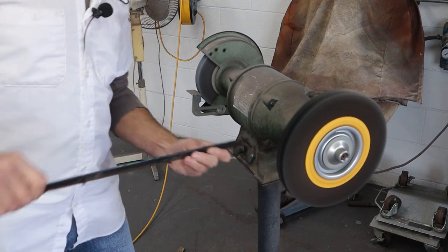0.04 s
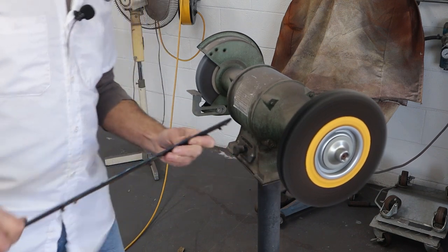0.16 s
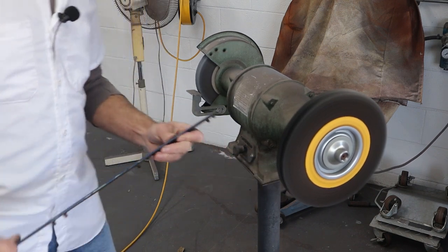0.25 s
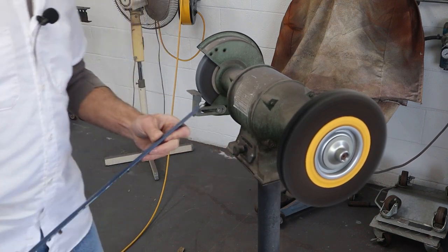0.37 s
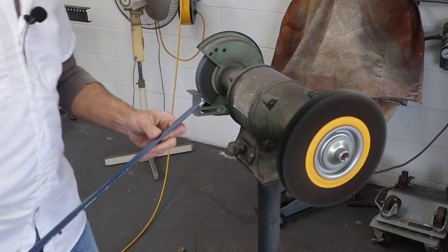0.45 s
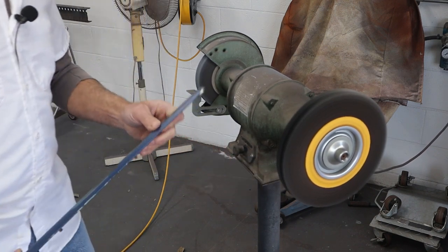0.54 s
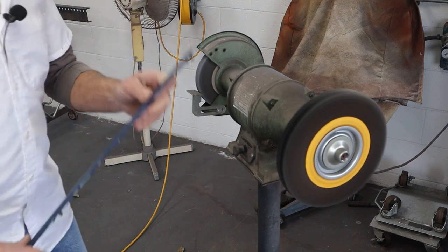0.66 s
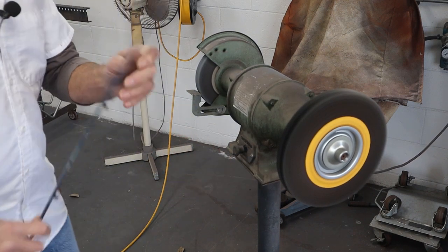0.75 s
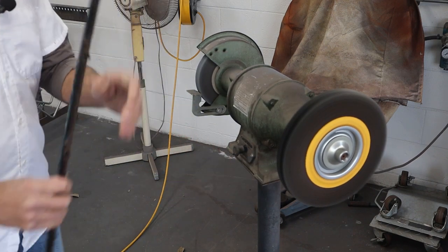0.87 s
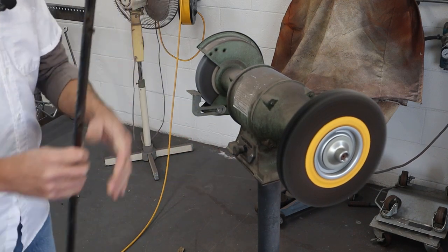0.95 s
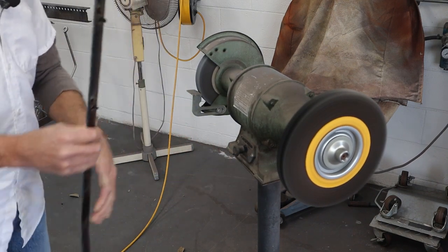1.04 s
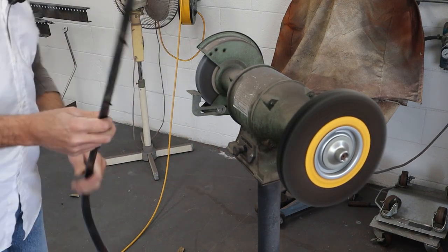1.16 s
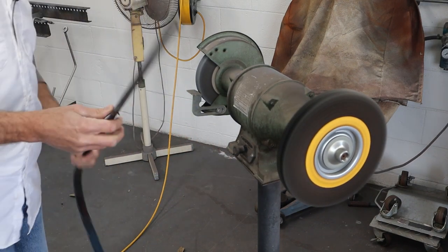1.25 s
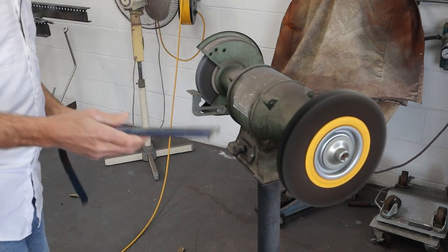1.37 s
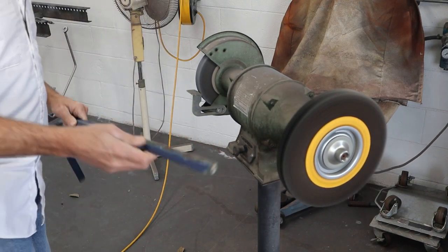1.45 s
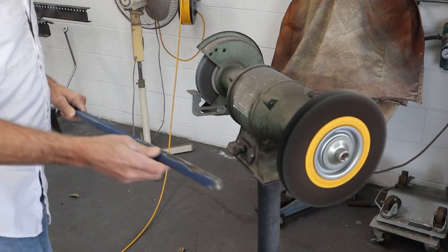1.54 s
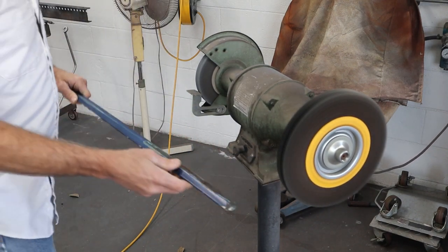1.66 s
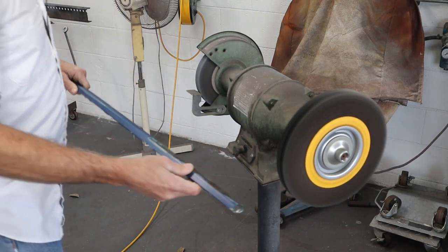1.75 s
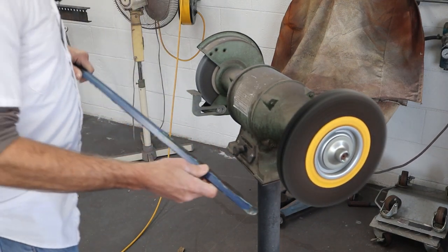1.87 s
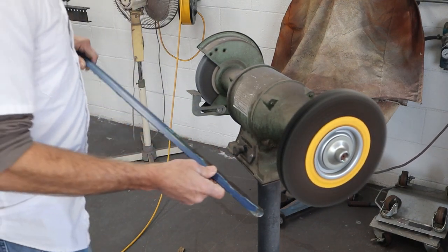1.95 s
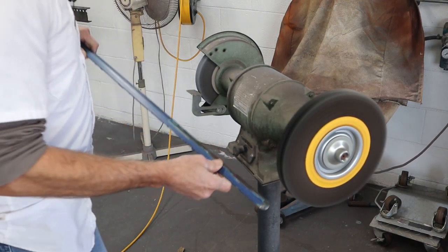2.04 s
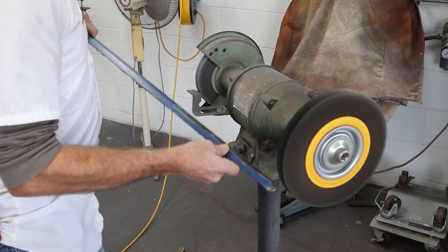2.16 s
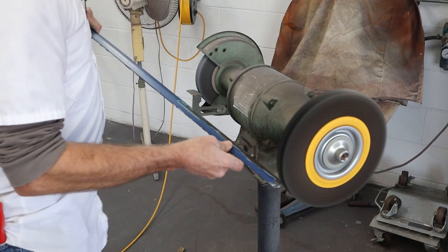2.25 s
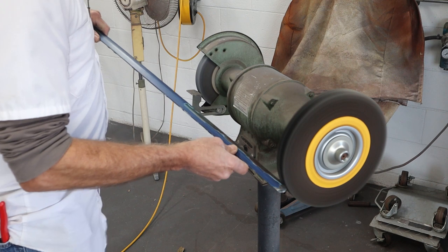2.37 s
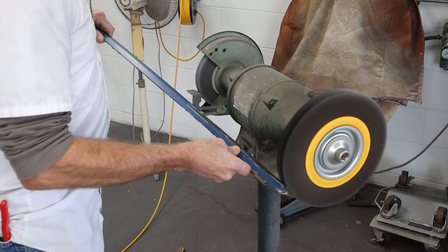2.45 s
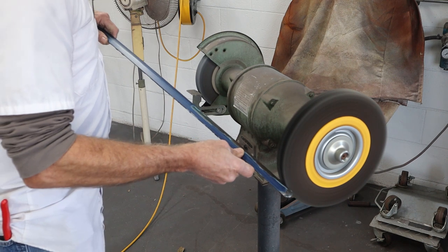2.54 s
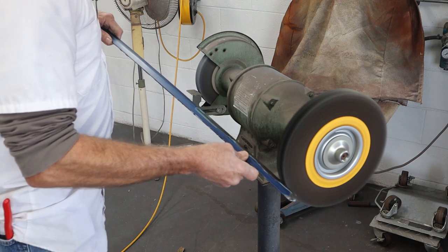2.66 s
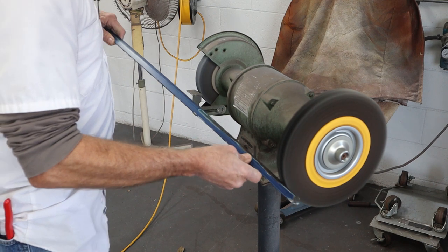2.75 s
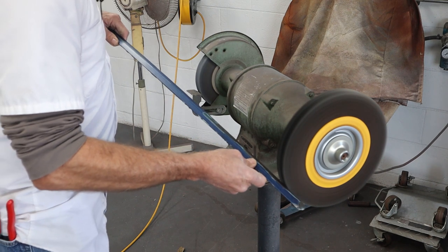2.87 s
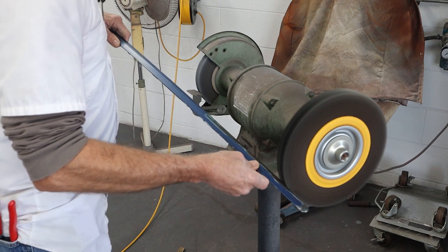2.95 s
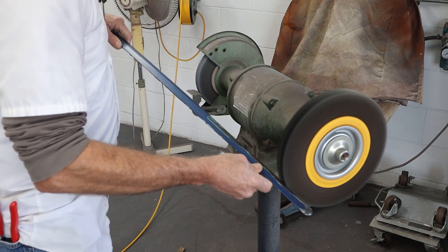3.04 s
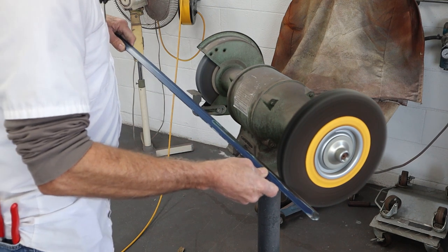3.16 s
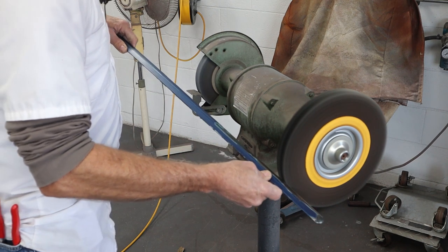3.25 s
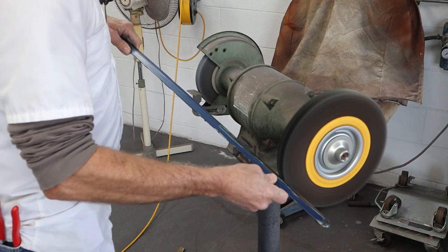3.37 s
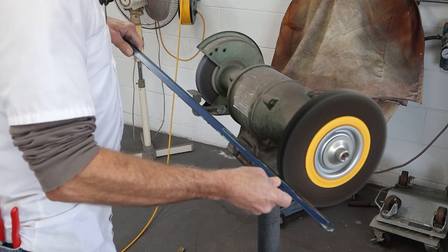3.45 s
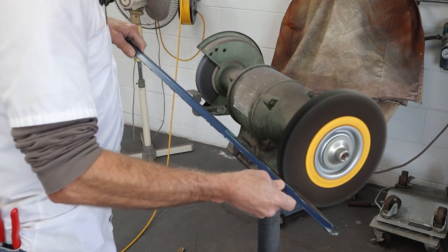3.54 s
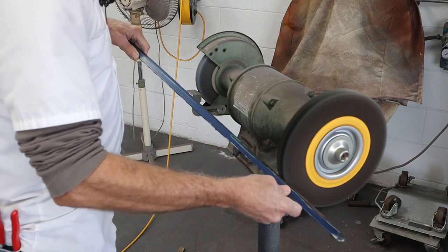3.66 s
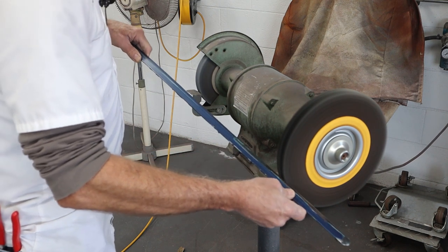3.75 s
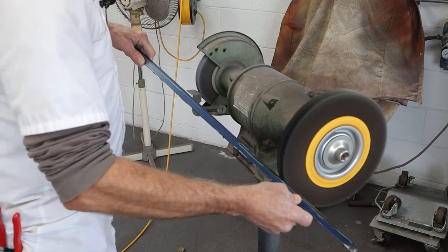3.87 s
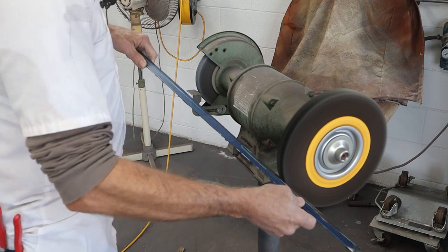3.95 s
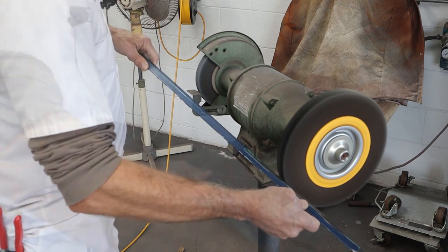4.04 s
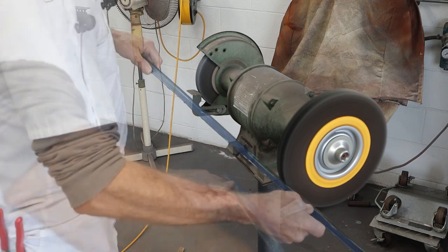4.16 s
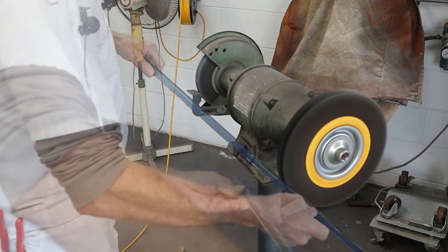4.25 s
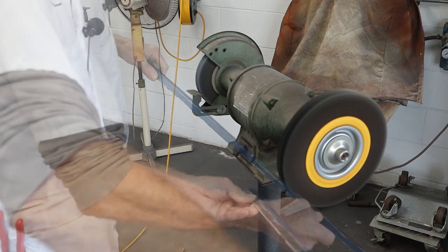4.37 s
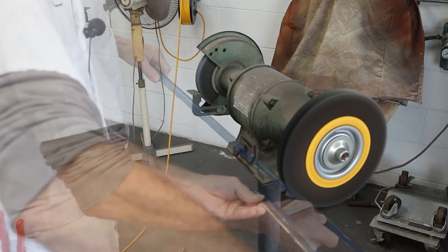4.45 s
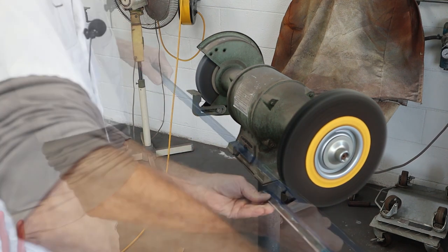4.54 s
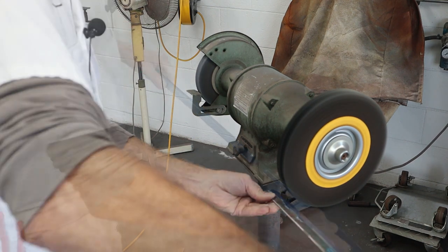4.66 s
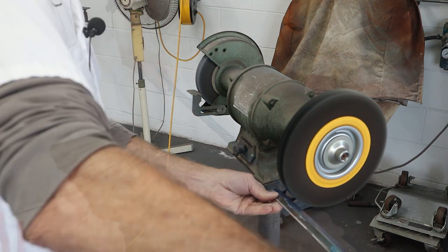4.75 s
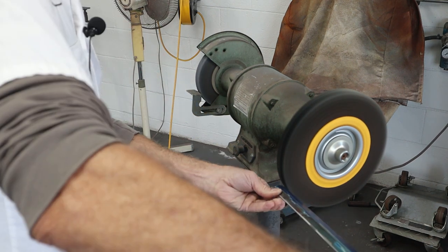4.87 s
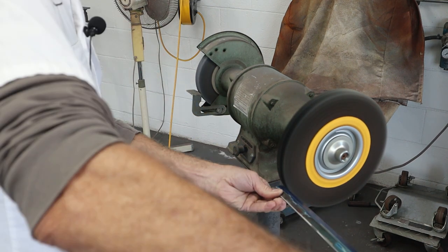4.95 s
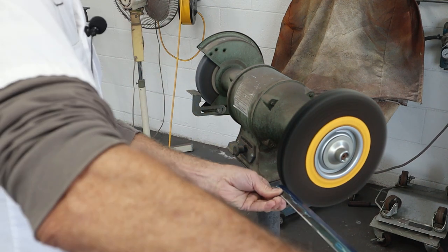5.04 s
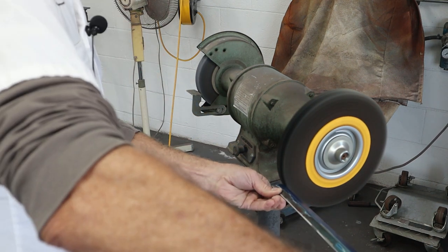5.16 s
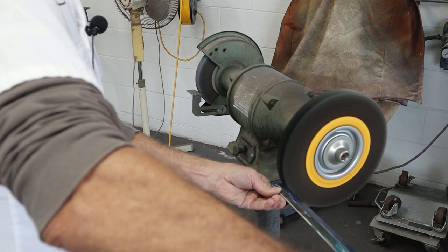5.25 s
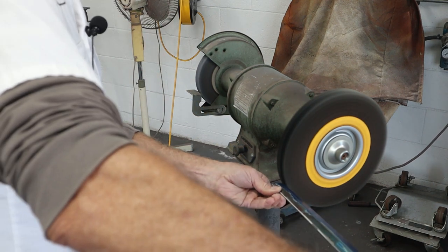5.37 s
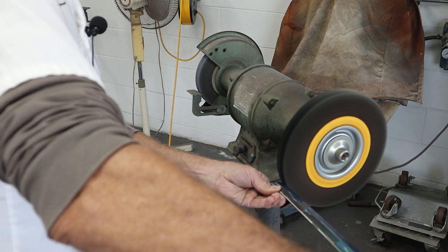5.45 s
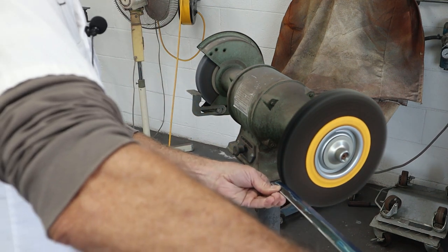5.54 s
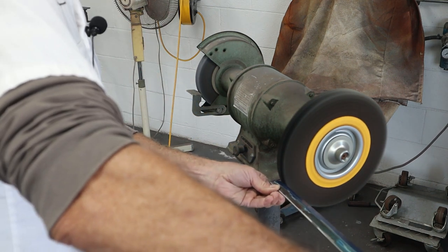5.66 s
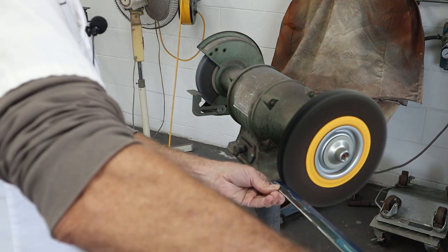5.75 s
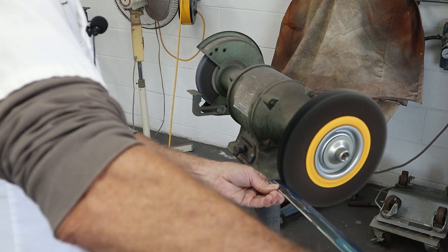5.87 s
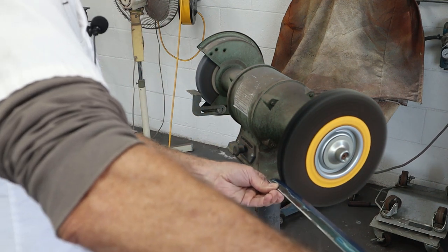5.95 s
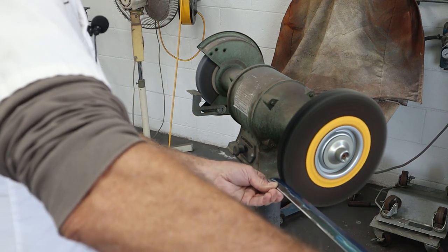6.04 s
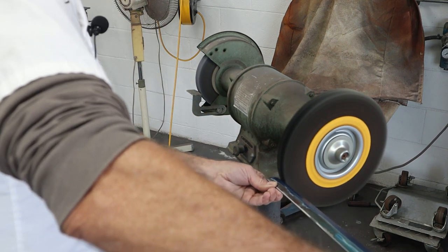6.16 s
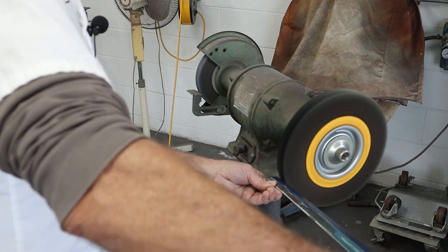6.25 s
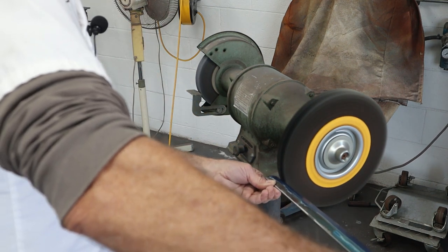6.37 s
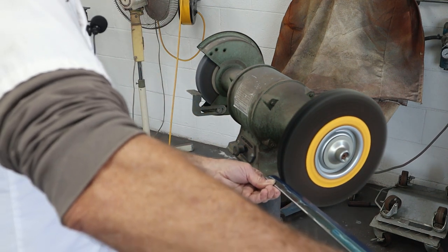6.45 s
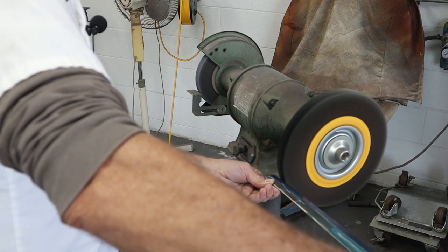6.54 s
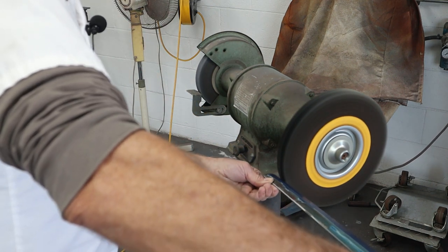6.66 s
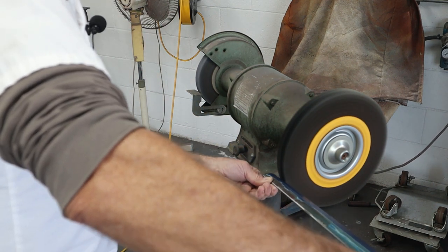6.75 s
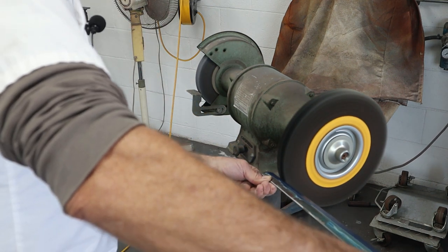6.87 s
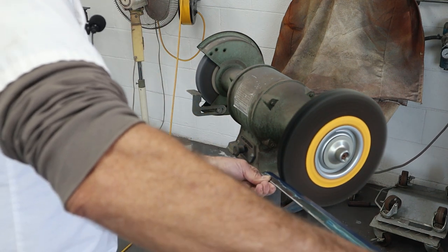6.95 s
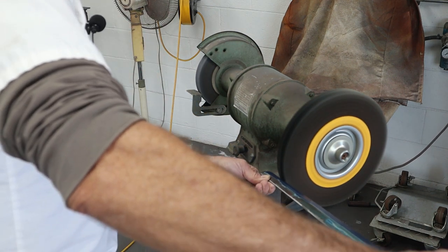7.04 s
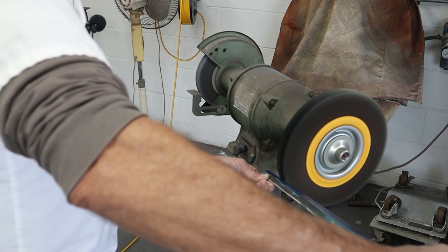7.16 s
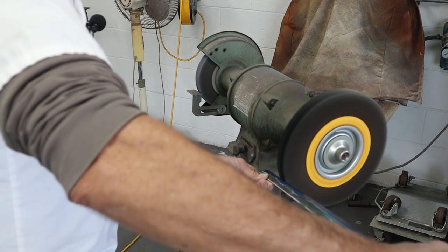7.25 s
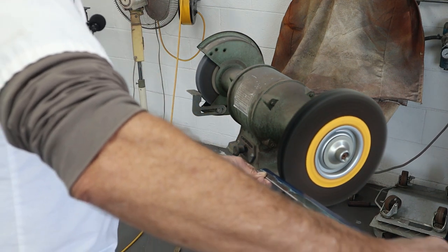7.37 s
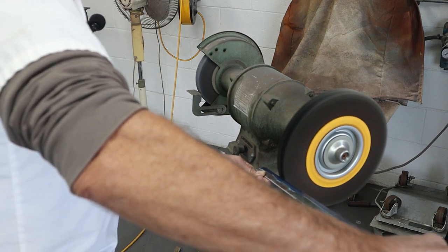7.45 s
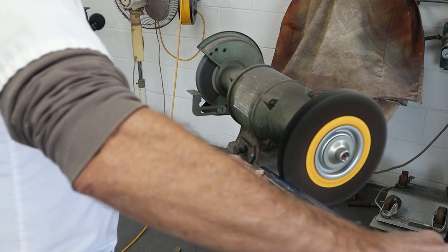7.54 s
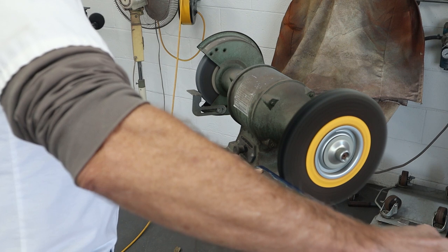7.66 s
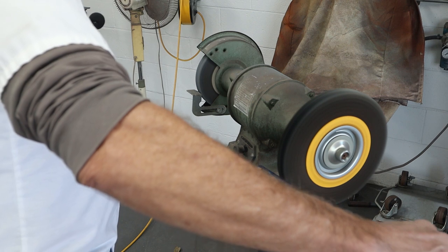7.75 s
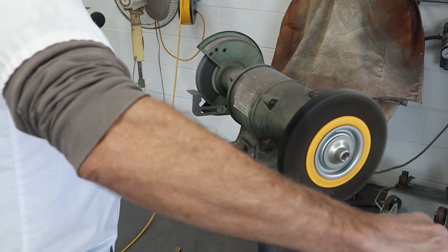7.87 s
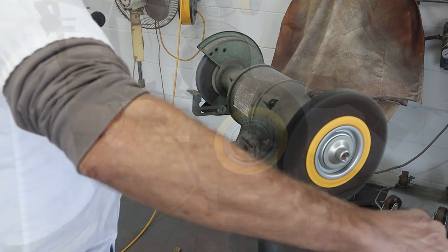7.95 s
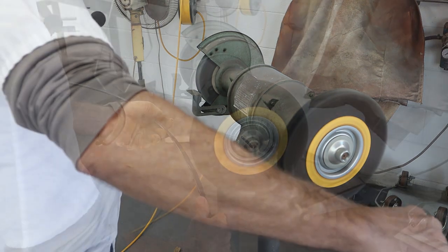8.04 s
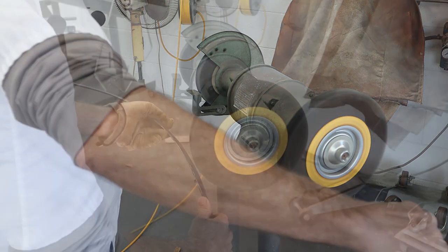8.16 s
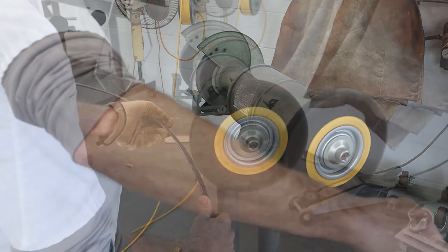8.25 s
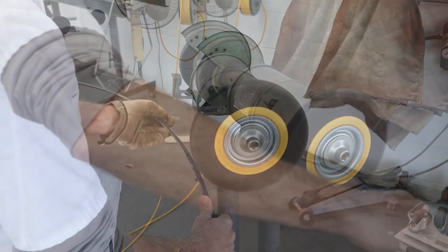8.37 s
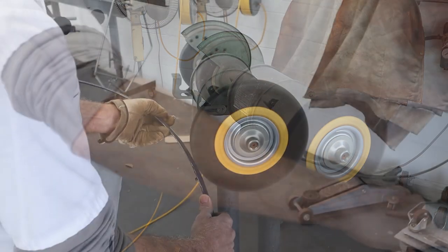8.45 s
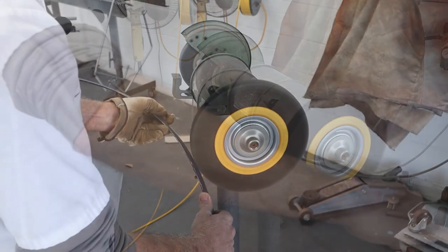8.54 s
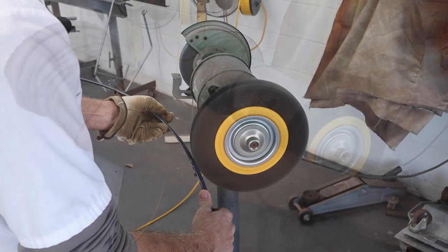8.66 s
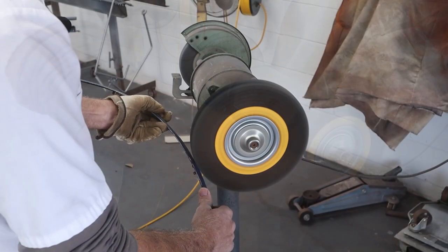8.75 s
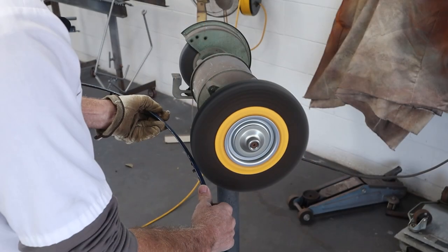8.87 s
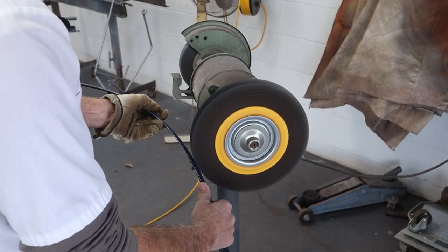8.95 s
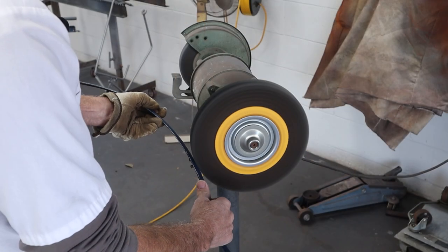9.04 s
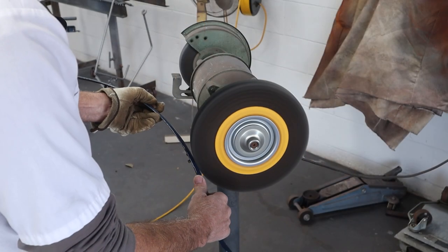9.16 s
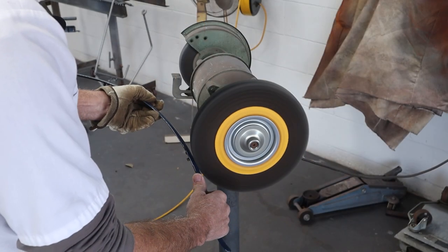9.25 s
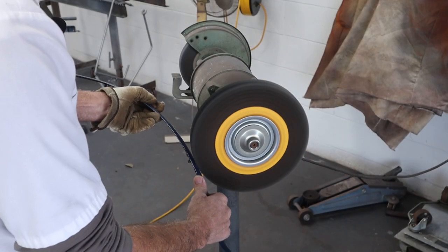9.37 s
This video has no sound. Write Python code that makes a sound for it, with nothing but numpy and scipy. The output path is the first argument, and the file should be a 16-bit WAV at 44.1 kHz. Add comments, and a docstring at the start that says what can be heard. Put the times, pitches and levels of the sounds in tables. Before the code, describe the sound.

A steel strip scrapes harshly against a spinning bench-grinder wire wheel in three passes, while the wheel's draught thumps and buffets a lapel microphone.

```python
"""A steel strip scrapes on the wire wheel of a bench grinder, pressed on it in three passes.
The same bristles strike once a turn, so the scrape is combed at the wheel speed, which sags under load.
The wheel's draught buffets a lapel microphone: bursts of low rumble and higher flutter over a slow sway.
Beneath lie a workshop hum, the hiss of the wires through the air and the tones of the motor.
The sound runs in three stretches; the wheel turns freely again at the start of the second and third."""
import sys
import numpy as np
from scipy import signal
from scipy.fft import rfft, irfft, next_fast_len
from scipy.io import wavfile
from scipy.ndimage import uniform_filter1d, map_coordinates

SR = 44100
rng = np.random.default_rng(int(sys.argv[2]) if len(sys.argv) > 2 else 0)


def invert_db(level):
    """Linear amplitude ratio for a level in decibels (20 dB per decade), elementwise."""
    return 10 ** (np.asarray(level, dtype=float) / 20)


def transcribe(u):
    """Save the signal u as a 16-bit wav file named by the first command-line argument.

    u: samples, shape (n,) or (channels, n), limited to [-1, 1]; the rate is SR.
    q: integer samples, one column per channel.
    """
    v = np.clip(np.atleast_2d(u).T, -1, 1)
    q = np.round(v * 32767).astype(np.int16)
    wavfile.write(sys.argv[1], SR, q)


N = 414540
TIME = np.arange(N) / SR


def unit(x):
    """Scaled to rms 1."""
    return x / np.sqrt(np.mean(x ** 2) + 1e-20)


def along(points, hz):
    """Level in dB along (pitch_hz, level_db) points on a log pitch axis, -120 dB outside them."""
    f, v = np.transpose(points)
    return np.interp(np.log(hz + 1), np.log(f + 1), v, left=-120, right=-120)


def curves(rows, t=TIME):
    """One curve for each column after the time."""
    s, *columns = np.transpose(rows)
    return [np.interp(t, s, column) for column in columns]


def wobble(rate, t=TIME):
    """A smooth random curve with a given rate of knots a second."""
    return map_coordinates(rng.standard_normal(400), [np.clip(t * rate, 0, 398)])


def during(t, start, end, fade):
    """1 between start and end, with soft edges lasting fade seconds."""
    return np.clip(np.minimum(t - start, end - t) / fade + 1 / 2, 0, 1)


def noise(spectrum):
    """Noise of rms 1, coloured by shaping its spectrum."""
    m = next_fast_len(N)
    hz = np.fft.rfftfreq(m, 1 / SR)
    shaped = rfft(rng.standard_normal(m)) * invert_db(along(spectrum, hz))
    return unit(irfft(shaped, m)[:N])


# The three stretches and how the load slows the wheel in each.
# columns: start_s, load_start_s, speed_loss_hz_per_s, growth_of_loss_hz_per_s2
STRETCHES = [(0, 2.42, 2.4, .42), (4.425, 5.4, 4.9, -.65), (8.395, 8.37, 4.6, 0)]


def stretch():
    """Which stretch each sample belongs to."""
    return np.searchsorted([row[0] for row in STRETCHES], TIME, side="right") - 1


def speed():
    """Turns per second: free until the strip loads the wheel, then sagging."""
    free_hz = 56.7
    _, load_start, loss, growth = np.transpose(STRETCHES)[:, stretch()]
    loaded = np.maximum(TIME - load_start, 0)
    return free_hz - loss * loaded - growth * loaded ** 2


# Level of the workshop at the microphone. columns: time_s, hum_db
WORKSHOP = [(0, -37.5), (.8, -40.5), (1.6, -41.5), (2.7, -38), (4.42, -42.5), (4.43, -39), (5.15, -45.5),
            (5.3, -44), (8.39, -71), (8.4, -37.5), (9.4, -37.5)]
# Colour of the hum. columns: pitch_hz, level_db (per Hz, relative)
HUM_COLOUR = [(20, -32), (60, -45), (150, -42), (400, -1), (650, -5), (1130, -3), (2430, -6), (3300, -9),
              (6000, -11.5), (16200, -16.5)]
# Colour of the hiss of the wires. columns: pitch_hz, level_db (per Hz, relative)
HISS_COLOUR = [(2000, -58), (3200, -18.5), (4470, -15.5), (5550, -5), (6420, -4.5), (7400, -10.5),
               (8500, -10), (14000, -17.5), (16200, -22)]
# Hiss over the hum, one value for each stretch. column: level_db
HISS_LEVELS = [5.5, -0.5, 6]
# Tones of the motor. columns: pitch_hz, level_db (relative to the whine level)
MOTOR = [(118.4, -10), (409.1, 2), (479.1, -8.5), (522.2, -18), (1098, -11), (1174, -14)]


def idle():
    """Wires hiss through the air over the workshop's hum and the slightly unsteady tones of the motor."""
    tones = np.zeros(N)
    for hz, db in MOTOR:
        loudness = invert_db(db + 0.5 * wobble(3.2))
        tones += loudness * np.sin(2 * np.pi * hz * TIME + 0.5 * wobble(8))
    # the whine, in dB over the hum, comes forward for a while
    whine_db = -15 + 10.2 * during(TIME, 0.78, 2.64, fade=0.37)
    hiss_db = np.array(HISS_LEVELS)[stretch()] + 0.4 * wobble(3.4)
    hum, hiss = noise(HUM_COLOUR), noise(HISS_COLOUR)
    return invert_db(curves(WORKSHOP)[0]) * (hum + invert_db(hiss_db) * hiss + invert_db(whine_db) * tones)


# Draught on the microphone, before the buffets are added. columns: time_s, rumble_db
DRAUGHT = [(0, -41), (.44, -31), (.74, -43), (.95, -52.5), (1.7, -62.5), (2.4, -51.5), (2.66, -41),
           (3.14, -33.5), (3.42, -23), (4.05, -31), (4.41, -30), (4.43, -16.5), (4.62, -16.5),
           (5.15, -22.5), (5.59, -16.5), (6.13, -25), (6.34, -21.5), (6.77, -23.5), (8.32, -24.5),
           (8.71, -48.5), (9.4, -49.5)]
# Hard buffets on top of it. columns: peak_s, rumble_db, flutter_db
BUFFETS = [(0.095, -23.5, -55), (0.272, -12, -19.5), (0.482, -10, -20), (0.723, -15.5, -23),
           (0.849, -24, -37), (2.563, -26, -47), (2.889, -25, -34), (3.233, -11, -35), (3.335, -17, -38),
           (3.483, -16, -25.5), (3.599, -12.5, -37), (3.798, -8.5, -35), (4.321, -13.5, -42),
           (4.435, -15, -18), (4.465, -8.5, -22.5), (4.53, -16, -22), (4.62, -21, -19), (4.67, -6, -21),
           (4.869, -14, -21), (4.966, -7.5, -24), (5.085, -11, -20), (5.239, -9, -29), (5.285, -15, -46),
           (5.362, -22, -23), (5.413, -18, -15), (5.467, -8.5, -38), (5.57, -17, -48), (5.761, -19, -25),
           (5.885, -7.5, -23), (5.915, -2.5, -23), (5.964, -14, -36), (6.136, -4.5, -23), (6.228, -12, -28),
           (6.314, -11.5, -34), (6.379, -15, -30), (6.437, -7, -33), (6.491, -6, -29), (6.657, -6, -23),
           (6.943, -13.5, -38), (7.127, -11, -50), (7.508, -17, -24), (7.576, -10.5, -29),
           (7.705, -22, -27), (7.81, -11, -20.5), (7.968, -20, -22), (8.159, -18, -20), (8.256, -17, -23),
           (8.357, -15, -19.5), (8.526, -28, -58)]
# Colour of the rumble, before its flow is evened out. columns: pitch_hz, level_db (per Hz, relative)
RUMBLE_COLOUR = [(25, -16), (40, -6.5), (60, 3.5), (90, 1.5), (130, 0), (190, -7.5), (400, -26), (520, -52)]
# Colour of the flutter. columns: pitch_hz, level_db (per Hz, relative)
FLUTTER_COLOUR = [(120, -23.5), (220, -3), (300, -2), (450, -9.5), (700, -16.5), (1100, -27.5),
                  (1500, -28.5)]
# Colour of the slow sway. columns: pitch_hz, level_db (per Hz, relative)
SWAY_COLOUR = [(15, -16), (25, -2), (40, 7), (60, 1), (90, -14)]


def draught():
    """Eddies thump the capsule; the hardest ones flutter higher up, while the slow sway beneath changes less."""
    draught_db, = curves(DRAUGHT)
    rumble = invert_db(draught_db)
    flutter = invert_db(-23.5 + 0.6 * draught_db)  # 0.6 dB for each dB of rumble
    # chance buffets: level over the draught, scatter, flutter relative to rumble
    small_db, spread_db, small_flutter_db = 2.5, 2.5, -10.5
    when = rng.random(size=(90, 1)) * TIME[-1]
    size = rng.standard_normal(size=(90, 2))
    levels = curves(DRAUGHT, when)[0] + small_db + spread_db * size + [0, small_flutter_db]
    small = np.hstack([when, levels])
    for s, rumble_db, flutter_db in [*BUFFETS, *small]:
        near = slice(max(int(s * SR) - 3000, 0), int(s * SR) + 3000)
        away = np.abs(TIME[near] - s)
        rumble[near] += invert_db(rumble_db) * np.exp(-(away / 0.0097) ** 0.96)
        flutter[near] += invert_db(flutter_db) * np.exp(-(away / 0.0049) ** 0.79)
    stream = noise(RUMBLE_COLOUR)
    # an even flow, broken up by the eddies
    stream = stream / np.sqrt(np.abs(uniform_filter1d(stream ** 2, size=1500)) + 0.15)
    eddies = wobble(30)
    low = rumble * unit(invert_db(1.8 * eddies) * stream)
    high = flutter * unit(invert_db(2.13 * eddies) * noise(FLUTTER_COLOUR))
    sway = invert_db(-20) * uniform_filter1d(rumble, size=4000) ** 0.65 * noise(SWAY_COLOUR)
    return low + high + sway


# Tufts of wire spaced evenly round the rim sing while they catch the edge.
# columns: strikes_per_turn, start_s, end_s, level_db (over the other wires, before boost_db is added)
TUFTS = [(110, 2.38, 2.61, 9), (86, 2.38, 2.72, 8), (96, 2.79, 4.43, 8), (107, 3.6, 4.31, 8),
         (52, 3.62, 3.84, 9), (76, 3.92, 4.43, 10), (25, 4.15, 4.43, 17), (72, 3.04, 3.26, 7),
         (61, 5.17, 5.56, 9), (30, 5.88, 6.16, 9), (117, 7.57, 8.39, 6), (40, 8.05, 8.39, 10),
         (28, 8.3, 9.45, 12), (51, 8.39, 8.67, 9), (49, 8.72, 9.45, 10), (34, 8.8, 9.15, 9),
         (25, 8.9, 9.45, 10), (27, 9.1, 9.45, 9), (76, 8.92, 9.45, 6), (82, 2.38, 2.92, 5),
         (118, 3.98, 4.43, 6), (70, 7.86, 8.39, 7), (92, 7.6, 8.39, 6), (67, 8.8, 9.3, 7),
         (53, 9.2, 9.45, 9)]


def bristles(boost_db):
    """Strikes laid out round the rim; each turn keeps most of the turn before, coarse spacing best of all."""
    rim, count = 1024, 520  # places round the rim, number of turns
    turns = np.cumsum(speed()) / SR
    spacing = rfft(rng.standard_normal((count, rim)))
    alike = 0.97 - 0.09 * np.arange(rim // 2 + 1) / 300
    for turn in range(1, count):
        spacing[turn] = alike * spacing[turn - 1] + np.sqrt(1 - alike ** 2) * spacing[turn]
    # some spacings stand out for a while
    favoured = uniform_filter1d(rng.standard_normal(spacing.shape), size=16, axis=0)
    spacing = spacing * invert_db(2.48 * unit(favoured))
    seconds = np.interp(np.arange(count) + 1 / 2, turns, TIME)  # middle of each turn
    for order, start, end, db in TUFTS:
        caught = during(seconds, start, end, fade=0.036)
        loudness = invert_db(db + boost_db + 1.5 * wobble(7, seconds))
        phase = wobble(3, seconds) + order
        spacing[:, order] += caught * loudness * np.exp(1j * phase) * np.sqrt(rim)
    # the strip skips once a turn until it seats, in the first two passes
    chatter_db, chatter_s = 2, 0.084
    skipping = np.zeros(N)
    for rows in PASSES[:2]:
        since = TIME - rows[0][0]
        skipping += (since > 0) * np.exp(-np.abs(since) / chatter_s)
    # the rim is not quite round
    runout = invert_db((0.92 + chatter_db * skipping) * np.cos(2 * np.pi * turns))
    strikes = irfft(spacing).ravel()[(turns * rim).astype(int)]
    loose = 0.22 * rng.standard_normal(N)  # hits that do not repeat
    return runout * (strikes + loose)


# Loudness of each pass of the strip. columns: time_s, scrape_db (before small random wobbles)
PASSES = [
    [(2.388, -24.5), (2.47, -23), (2.54, -18.5), (2.83, -24.5), (3.12, -19.5), (3.28, -22), (3.46, -16.5),
     (3.85, -16.5), (3.98, -22.5), (4.25, -15), (4.425, -19.5)],
    [(5.18, -42.5), (5.36, -34.5), (5.75, -29.5), (6.1, -32.5), (6.75, -34.5), (7.05, -28.5), (7.55, -32),
     (7.9, -29.5), (8.395, -30)],
    [(8.395, -35.5), (8.67, -26), (8.9, -24), (9.4, -23.5)],
]
# Colour of each pass. columns: pitch_hz, level_db (per Hz, relative)
COLOURS = [
    [(530, -64), (900, -27.5), (3260, -16.5), (3820, -12.5), (4570, -11.5), (6110, -3.5), (7490, -10),
     (14500, -18), (16000, -26)],
    [(710, -28), (1200, -12), (3080, -8), (3470, -6), (3950, -7), (5650, 1.5), (9720, -7.5), (11800, -7),
     (16000, -13.5)],
    [(410, -52), (700, -40), (1230, -10.5), (1520, -6.5), (2130, -21), (2730, -8), (3280, -11), (4430, -6),
     (5260, 1), (16000, -18)],
]
# Ways the strip rings. columns: pitch_hz, width_hz, level_db (over the colour)
STRIP = [(1230, 92, -7), (1630, 110, 6.5), (2620, 470, 3), (3480, 200, 7.5), (3850, 440, 9.5),
         (4570, 440, 7.5), (4910, 330, 7), (5310, 400, 6), (5780, 530, 4.5), (6540, 660, 6), (7000, 217, 5),
         (9030, 1400, 5.5), (10160, 360, 10), (11500, 600, 4), (12120, 570, 10), (13300, 390, 3)]
# For each way of ringing, the spans while the grip lets it ring. columns: start_s, end_s
GRIP = [
    [(4.15, 4.5)],
    [(8.3, 9.2)],
    [(3.3, 3.85), (5.2, 5.6), (8.4, 8.65), (9.05, 9.5)],
    [(5.1, 5.46), (5.85, 6.66), (7.9, 8.39), (8.9, 9.2)],
    [(2.68, 2.96), (3.04, 3.26), (3.85, 4.16), (9.1, 9.5)],
    [(2.6, 2.76), (7.55, 7.9)],
    [(2.3, 2.7), (3, 3.2), (4.05, 4.5), (5.6, 5.85), (6.8, 7.4), (8.75, 9.1)],
    [(2.5, 2.63), (3.25, 3.7), (4.2, 4.4), (5.6, 6.4), (6.9, 7.3), (8.75, 9.25)],
    [(3, 3.2), (3.4, 3.98), (4.1, 4.35), (5.6, 5.9), (7.7, 8.39), (8.55, 9.5)],
    [(2.3, 2.62), (3.35, 3.55), (3.66, 3.9), (4.05, 4.3), (9.2, 9.5)],
    [(3.66, 3.9), (7.3, 8)],
    [(2.7, 2.9), (4.15, 4.5), (7.6, 8.39), (9.2, 9.5)],
    [(6, 6.95), (9.2, 9.5)],
    [(5.9, 7.6)],
    [(4.15, 4.5), (5.3, 6.55), (7.7, 8.39)],
    [(5.4, 6.6)],
]


def scrape():
    """Bristle strikes ring the strip; patches of the hiss swell and fade at random."""
    frame = 512  # samples
    hz, t, strikes = signal.stft(bristles(boost_db=-2), SR, nperseg=frame)
    f, out = hz[:, None], np.zeros(N)
    body = 0
    for (centre, width, db), spans in zip(STRIP, GRIP):
        peak = db / (1 + ((f - centre) / width * 2) ** 2)
        for span in spans:
            body = body + peak * during(t, *span, fade=0.088)
    main = (hz > 4400) & (hz < 7500)  # the band that sets the loudness
    for rows, colour in zip(PASSES, COLOURS):
        patches = uniform_filter1d(rng.standard_normal(strikes.shape), size=3, axis=0)
        patches = uniform_filter1d(patches, size=50, axis=1)
        gain = invert_db(along(colour, f) + body + 1.63 * unit(patches))
        gain = gain / np.sqrt(np.sum(gain[main] ** 2, axis=0) / len(hz))
        sound = signal.istft(strikes * gain, SR, nperseg=frame)[1][:N]
        touching = during(TIME, rows[0][0], rows[-1][0], fade=0.002)
        level_db = curves(rows)[0] + 0.78 * wobble(20) + 0.96 * wobble(30)
        out += touching * invert_db(level_db) * sound
    return out


def scene():
    """One microphone feeds both channels."""
    return np.tile(idle() + draught() + scrape(), (2, 1))


def roll_off(x):
    """The treble ends steeply here."""
    return signal.sosfilt(signal.butter(12, 15900, fs=SR, output="sos"), x)


def record(dry):
    """Gain control ducks just after each loud thump; peaks are rounded off at full scale."""
    memory_s, delay_s, knee_db = 0.01, 0.0108, -5.0
    forget = 1 / (memory_s * SR)
    heard = signal.lfilter([forget], [1, forget - 1], dry ** 2)
    late = np.pad(heard, ((0, 0), (int(delay_s * SR), 0)))[:, :N]
    ducked = dry / (1 + late / invert_db(knee_db) ** 2) ** 0.49
    rounded = ducked / (1 + np.abs(ducked) ** 10) ** (1 / 10)
    return roll_off(rounded)


dry = scene()
out = record(dry)
transcribe(out)
```